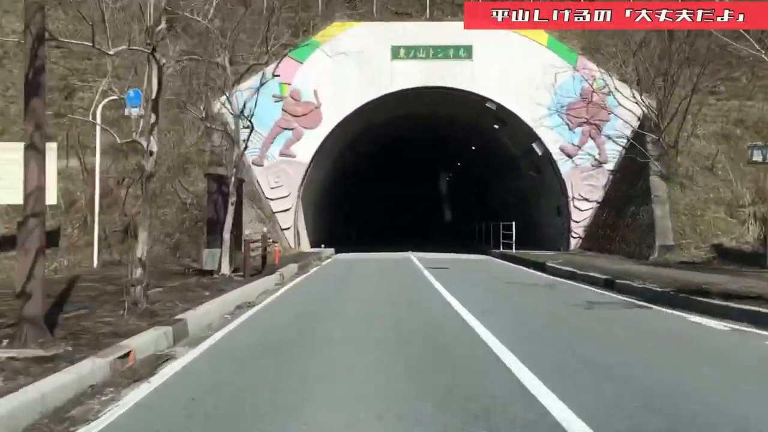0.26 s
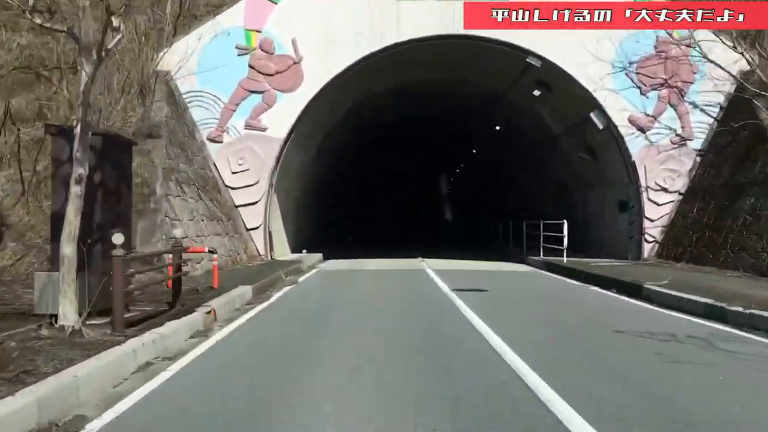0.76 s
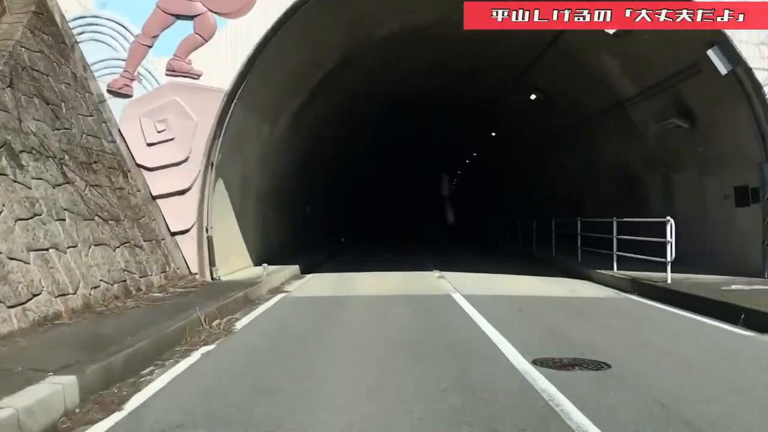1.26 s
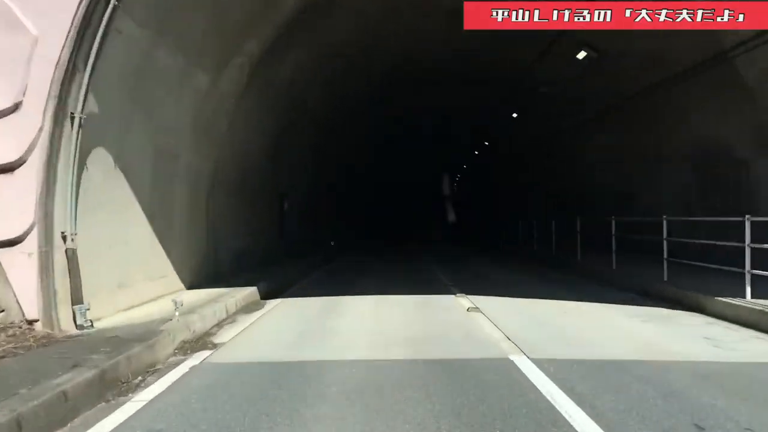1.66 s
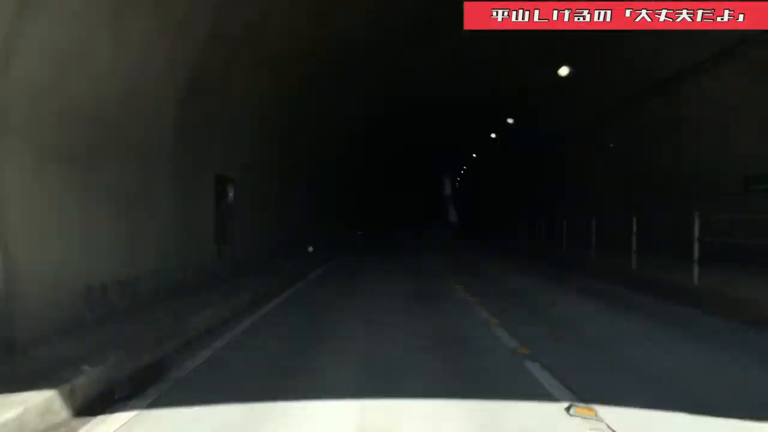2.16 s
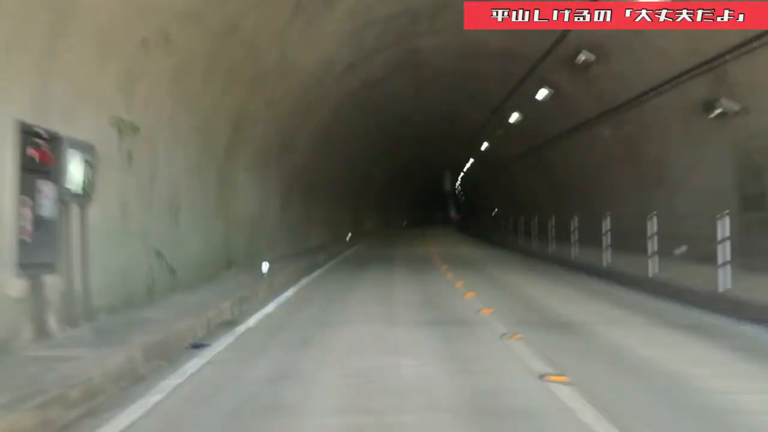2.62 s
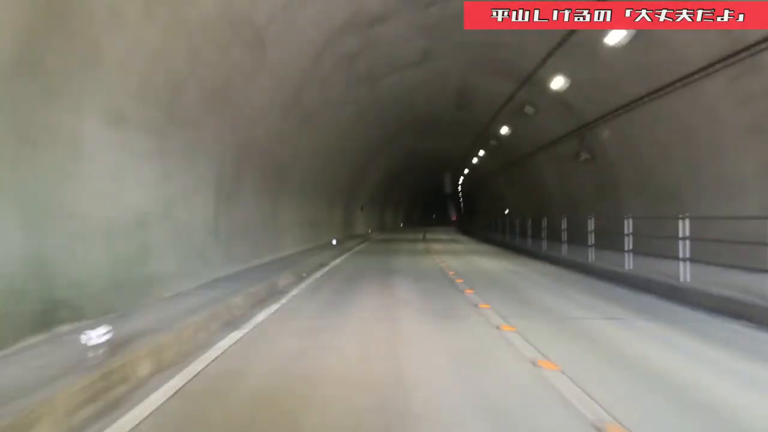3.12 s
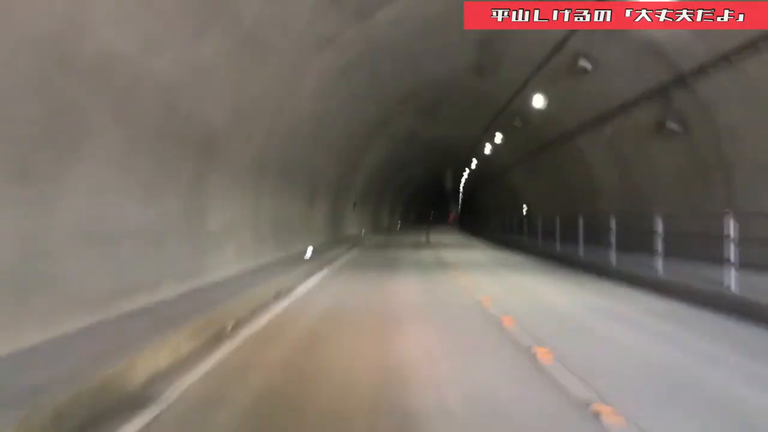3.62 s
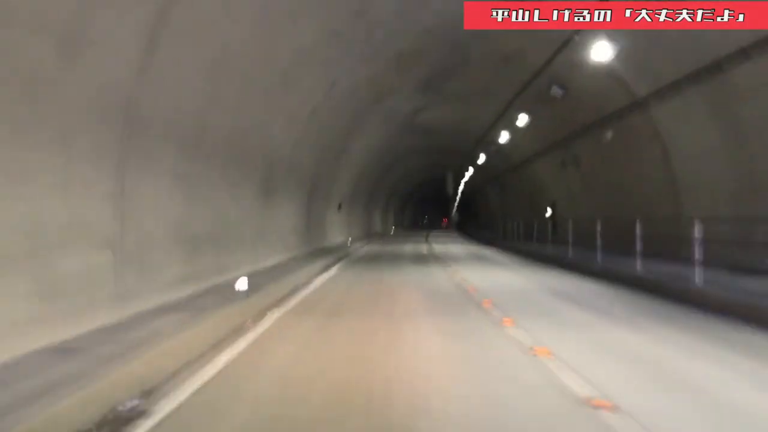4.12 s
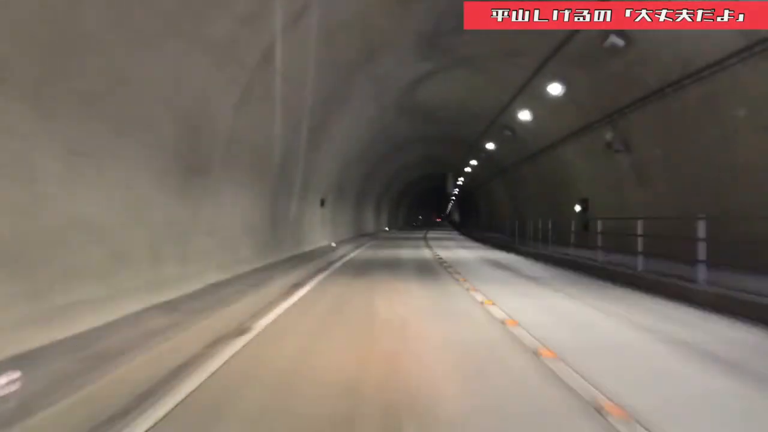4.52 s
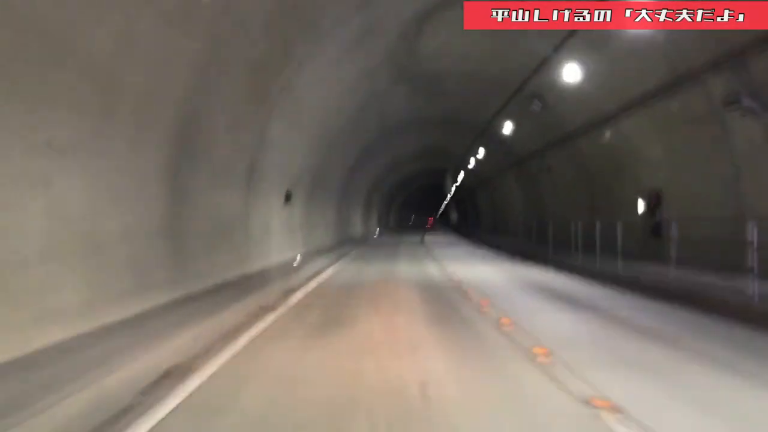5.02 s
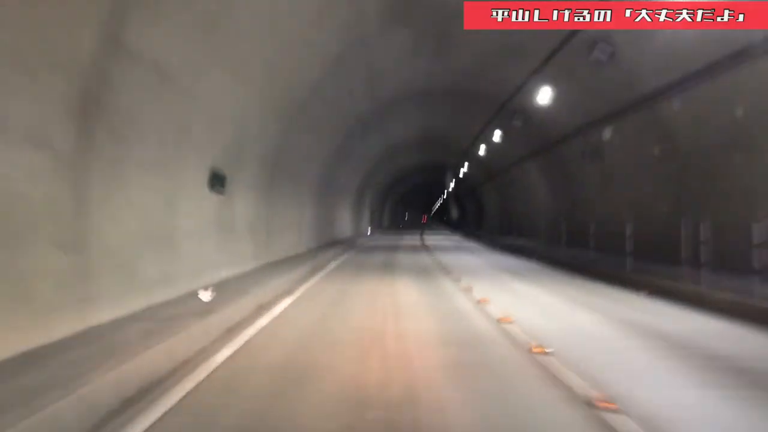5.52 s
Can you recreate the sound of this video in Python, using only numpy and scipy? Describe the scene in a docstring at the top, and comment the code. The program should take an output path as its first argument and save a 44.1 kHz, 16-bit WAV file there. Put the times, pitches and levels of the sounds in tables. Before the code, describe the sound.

Low, bass-heavy car cabin drone slowly rising in pitch, with soft road bumps, a brief plastic click cluster, then slightly fuller road noise in a tunnel.

```python
"""Cabin of a car that gently gathers speed and drives into a road tunnel.
Engine and drive shaft hum as sines on multiples of their own rates; high orders clatter and whine faintly.
The body booms as one unsteady low tone, lifted by bumps; tyre rumble, drone and hiss are filtered noise.
Loose trim clicks as decaying noise bursts, mostly just before the mouth; thin whistles and a top fizz are faint.
Inside, hum and boom ease off while the walls throw a little more tyre noise and hiss back."""
import sys
import numpy as np
from scipy import signal
from scipy.fft import rfft, irfft
from scipy.io import wavfile

SR = 44100
rng = np.random.default_rng(int(sys.argv[2]) if len(sys.argv) > 2 else 0)


def wav_record(signal):
    """Record a signal, one row per channel, as 16-bit PCM in the file named by sys.argv[1]."""
    frames = np.transpose(np.atleast_2d(signal))
    bounded = np.clip(frames, -1, 1)
    # unit amplitude maps onto the largest positive 16-bit level
    quanta = np.round(bounded * 32767).astype(np.int16)
    wavfile.write(sys.argv[1], SR, quanta)


N = 254898
TIME = np.arange(N) / SR
MOUTH_S, ENTRY_S = 2.8, 1.7  # middle and length of the passage into the tunnel

# Engine cycle rate before jitter: (t/s, f/Hz)
CYCLE_RATE = [(0.0, 30.31), (0.82, 30.9), (1.65, 31.16), (2.47, 31.71), (3.3, 32.23), (4.12, 32.66),
              (4.95, 33.12), (5.77, 33.62)]
# Firing hum before flutter, easing off inside the tunnel: (t/s, level/dB)
HUM_LEVEL = [(0, -26.5), (1.4, -25), (3.0, -25), (3.6, -28), (4.3, -27), (4.65, -28.5), (5.78, -31)]
# Weaker engine tones, before orders_db and wander: (multiple of the cycle rate, level/dB)
ENGINE_ORDERS = [(6, -35.5), (7, -40), (8, -41.5), (9, -40.5), (11, -49), (12, -48), (13, -55), (15, -56),
                 (16, -56.5), (17, -55), (18, -57.5), (20, -54.5), (21, -57.5)]
# Orders that sing out for a while, 50 being the gear whine; before orders_db:
# (multiple of the cycle rate, start t/s, end t/s, level/dB)
ENGINE_FLARES = [(6, 2.1, 3.7, -30.5), (6, 4, 6, -31), (9, .7, 2.7, -33.5), (12, 3, 5, -41),
                 (18, .2, 1.8, -51), (27, 1.7, 3.1, -58), (50, .45, 2.2, -54), (52, .3, .8, -63),
                 (53, .4, 1.6, -65), (57, 2.3, 2.88, -60.5), (49, 2.8, 3.3, -61), (50, 2.85, 3.45, -55),
                 (49, 3.55, 4.1, -58), (54, 3.65, 4.6, -61.5), (50, 3.75, 5.05, -53), (48, 4.45, 5.05, -60),
                 (46, 5, 5.9, -59.5), (54, 5, 5.9, -61.5), (47, 5.45, 5.95, -57), (50, 5.5, 6, -55.5)]


def engine(pulses_per_cycle=3, hum_flutter=0.059, jitter=0.00044, orders_db=-0.23):
    """Firing pulses give a strong hum; harmonics, unevenness and gears add weaker orders of the cycle rate."""
    cycle_hz = curves(CYCLE_RATE)[0] * (1 + jitter * drift(5.8))
    cycles = np.cumsum(cycle_hz) / SR
    hum_level = gain_of(curves(HUM_LEVEL)[0]) * (1 + hum_flutter * drift(8))
    hum = hum_level * tone(pulses_per_cycle * cycles)
    orders = partials(cycles, ENGINE_ORDERS, ENGINE_FLARES, wander_db=1.5, flutter=0.2)
    return hum + gain_of(orders_db) * orders, cycles


# Carry of high engine orders into the cabin, per order, before comb_db: (f/Hz, level/dB)
CLATTER_SPECTRUM = [(750, -63.5), (1200, -68), (1450, -71), (1600, -66.5), (1800, -67), (2000, -77),
                    (2800, -88), (3500, -76), (4400, -76), (6400, -83)]


def clatter(cycles, fade_hz=0.73, comb_db=-1):
    """A comb of high engine orders, each fading in and out by chance."""
    comb = sum(drift(fade_hz) * tone(order * cycles) for order in range(24, 110))
    return gain_of(comb_db) * coloured(comb, CLATTER_SPECTRUM)


# Drive shaft tones, before shaft_db and wander: (multiple of shaft speed, level/dB)
SHAFT_ORDERS = [(4, -35), (5, -41.5), (6, -43.5)]
# Shaft orders that sing out, before shaft_db: (multiple of shaft speed, start t/s, end t/s, level/dB)
SHAFT_FLARES = [(4, -.5, .5, -29), (4, .5, 2.6, -33), (4, 4.9, 6.2, -30.5), (5, -.3, 1.5, -32.5),
                (5, 4.9, 6.1, -30), (6, 2.1, 3.8, -33), (7, 2.6, 4.6, -39)]


def shaft(start_hz=37.8, rise_hz_per_s=1.05, shaft_db=-0.5):
    """Orders of a shaft that speeds up steadily, so they slide against those of the engine."""
    turns = np.cumsum(start_hz + rise_hz_per_s * TIME) / SR
    return gain_of(shaft_db) * partials(turns, SHAFT_ORDERS, SHAFT_FLARES, wander_db=3.0, flutter=0.24)


BOOM_HZ, BOOM_WIDTH_HZ = 54.1, 4.43
BOOM_DB, BOOM_FALL_DB_PER_S = -24.5, 2.5  # between bumps; falls from the mouth on, over a smoother floor
BUMP_RISE_S, BUMP_T60_S = 0.035, 0.2
# Road bumps that set the cabin booming: (t/s at the end of the rise, hold/s, level/dB)
ROAD_BUMPS = [(0.011, 0.038, -17), (0.55, 0.046, -21.5), (0.79, .04, -20), (1.505, .06, -22),
              (2.023, .02, -20.5), (2.175, .02, -21), (2.374, .17, -17), (2.696, .01, -19),
              (2.808, 0.069, -20), (3.238, .02, -18), (3.561, 0.027, -17.5), (3.664, 0.028, -20),
              (4.367, 0.094, -19.5), (4.633, 0.11, -17), (5.37, 0.024, -19)]


def boom(unrest=0.29, unrest_hz=8):
    """The cabin rings at one low, unsteady pitch; each bump pulls it to a level, holds it and lets it go."""
    floor_db = BOOM_DB - BOOM_FALL_DB_PER_S * np.maximum(TIME - MOUTH_S, 0)
    level = gain_of(floor_db) * (1 + unrest * drift(unrest_hz))
    for s, hold_s, db in ROAD_BUMPS:
        rise = np.clip((TIME - s) / BUMP_RISE_S + 1, 0, 1)
        decay = gain_of(-60 * np.maximum(TIME - s - hold_s, 0) / BUMP_T60_S)
        level = level + rise * decay * (gain_of(db) - level)
    hz = BOOM_HZ + BOOM_WIDTH_HZ / 2 * drift(7.1)
    return level * tone(np.cumsum(hz) / SR)


# Tyre noise through the body, before the gains in tyres(): (f/Hz, level/dB per Hz)
RUMBLE_SPECTRUM = [(15, -79), (27, -66), (39, -47.5), (62, -46.5), (82, -56.5), (108, -52.5), (135, -54),
                   (170, -52.5), (220, -50.5), (260, -56), (295, -51), (325, -55.5), (375, -55), (450, -70),
                   (600, -113)]
# Relative shape of the tyre drone: (f/Hz, level/dB per Hz)
DRONE_SPECTRUM = [(60, -100), (108, -24), (122, -8), (134, 5.5), (144, -1), (165, -29.5), (300, -100)]
# Passing swells of the low tyre drone: (start t/s, end t/s, peak level/dB)
DRONE_SWELLS = [(-.1, .45, -33), (.7, 1.1, -29.5), (2.28, 2.394, -23.5), (2.54, 2.7, -25),
                (2.88, 3.065, -29.5), (3.753, 3.914, -29.5), (4.153, 4.816, -27), (5.47, 5.663, -24.5)]


def tyres(rumble_db=-0.25, tunnel_db=1.44, patchy_db=1.13, patchy_hz=6, steady_drone_db=-37):
    """Patchy rumble through the suspension; one cabin resonance drones in uneven swells."""
    rumble_gain = gain_of(rumble_db + tunnel_db * inside() + patchy_db * drift(patchy_hz))
    rumble = coloured(white(), RUMBLE_SPECTRUM) * rumble_gain
    drone_level = gain_of(steady_drone_db)
    for start, end, db in DRONE_SWELLS:
        drone_level = np.maximum(drone_level, gain_of(db) * swell(start, end))
    return rumble + drone_level * evened(coloured(white(), DRONE_SPECTRUM))


# Tyre and air noise through the glass, before the gains in hiss(): (f/Hz, level/dB per Hz)
HISS_SPECTRUM = [(250, -72), (480, -72), (660, -70.5), (780, -77.5), (1180, -80), (1420, -83.5),
                 (1680, -82.5), (2050, -89), (2800, -89), (3050, -94.5), (4200, -94), (4900, -99),
                 (6300, -100), (7600, -114), (10000, -130)]


def hiss(cycles, hiss_db=-0.92, rise_db_per_s=0.48, tunnel_db=0.77, flicker_db=0.5, throb=0.055):
    """Airborne noise, throbbing slightly with the engine cycle, rising steadily, louder between the walls."""
    level_db = hiss_db + rise_db_per_s * TIME + tunnel_db * inside() + flicker_db * drift(15)
    pulse = 1 + throb * (tone(cycles) + tone(2 * cycles)) / 2
    return coloured(white(), HISS_SPECTRUM) * gain_of(level_db) * pulse


# Loose trim, before decay and trim_db: (t/s, knock level/dB, bright snap level/dB)
TRIM_CLICKS = [(1.285, -51, -68), (1.406, -47, -57), (1.425, -47, -65), (1.582, -44, -64),
               (2.133, -44.5, -63), (2.188, -49, -66), (2.204, -43, -67), (2.219, -44.5, -37.5),
               (2.298, -50, -54), (2.343, -47, -56), (2.36, -45, -45.5), (2.364, -32.5, -39),
               (2.466, -44, -69), (3.644, -49, -70), (4.196, -43.5, -68)]
# Relative colour of the knock: (f/Hz, level/dB per Hz)
KNOCK_SPECTRUM = [(400, 4), (1000, 4.5), (1400, 2), (1900, 3.5), (2500, 5.5), (3100, -5.5), (4400, -5),
                  (6400, -17), (7600, -25), (11000, -30), (15000, -28)]
# Relative colour of the snap: (f/Hz, level/dB per Hz)
SNAP_SPECTRUM = [(2000, -22), (4400, -22), (5500, 6), (7500, -1.5), (9500, -1.5), (11500, -2),
                 (14000, -3.5), (15700, -5)]


def trim(trim_db=-2, chatter_s=0.0045, t60_s=0.061, crack_db=-8, crack_t60_s=0.0086,
         cabin_db=-18, cabin_t60_s=0.2, grit_db=1.5):
    """Each click cracks, chatters for some milliseconds, then dies away in the padded cabin."""
    t = np.arange(SR // 4) / SR
    decay = gain_of(-60 * np.maximum(t - chatter_s, 0) / t60_s)
    decay += gain_of(crack_db - 60 * t / crack_t60_s)
    decay += gain_of(cabin_db - 60 * t / cabin_t60_s)
    knock_power, snap_power = np.zeros((2, N))
    for s, knock_db, snap_db in TRIM_CLICKS:
        first = round(s * SR)
        part = slice(first, first + len(t))
        knock_power[part] += (gain_of(knock_db) * decay) ** 2  # separate clicks add in power
        snap_power[part] += (gain_of(snap_db) * decay) ** 2
    knocks = np.sqrt(knock_power) * evened(coloured(white(), KNOCK_SPECTRUM))
    snaps = np.sqrt(snap_power) * evened(coloured(white(), SNAP_SPECTRUM))
    grit = gain_of(trim_db + grit_db * np.clip(drift(170), -2, 2))
    return grit * (knocks + snaps)


# Thin high whistles: (mean f/Hz, start t/s, end t/s, peak level/dB)
WHISTLE_TONES = [(5216, .1, 1, -75), (3179, 2.38, 2.88, -63.5), (3179, 2.9, 6, -76)]


def whistle(waver_hz=3):
    """Faint, nearly steady high sines, strongest just around the tunnel mouth."""
    total = 0
    for hz, start, end, db in WHISTLE_TONES:
        turns = np.cumsum(hz + waver_hz * drift(10)) / SR
        total = total + gain_of(db) * swell(start, end) * tone(turns)
    return total


# Relative colour of the top hiss: (f/Hz, level/dB per Hz)
FIZZ_SPECTRUM = [(3000, -25.5), (6500, 0), (7600, -0.5), (8400, 0), (9800, -2.5), (10450, -12), (11200, -9),
                 (13500, -7), (15700, -16)]


def fizz(fizz_db=-70, tunnel_db=0.1, wander_db=0.5, swell_start_s=0.84, swell_end_s=0.86, swell_db=-73):
    """A faint, thin noise at the very top, with one brief swell."""
    level = gain_of(fizz_db + tunnel_db * inside() + wander_db * drift(4))
    level = level + gain_of(swell_db) * swell(swell_start_s, swell_end_s)
    return level * evened(coloured(white(), FIZZ_SPECTRUM))


def inside():
    """0 on the open road, 1 between the tunnel walls."""
    return np.clip((TIME - MOUTH_S) / ENTRY_S + 0.5, 0, 1)


def partials(turns, steady, flares, wander_db, flutter):
    """Tones on multiples of a base rate; each wanders in level and swells during its flares."""
    levels = {round(order): gain_of(db + wander_db * drift(1.5)) for order, db in steady}
    for order, start, end, db in flares:
        flare = gain_of(db) * swell(start, end, roundness=0.22)
        levels[order] = np.maximum(levels.get(order, 0), flare)
    return sum(level * (1 + flutter * drift(7.7)) * tone(order * turns) for order, level in levels.items())


def swell(start, end, roundness=0.45):
    """A rise and fall between two times, 1 at the top; the less round, the longer it holds."""
    share = np.clip((TIME - start) / (end - start), 0, 1)
    return np.sin(np.pi * share).clip(0) ** roundness


def tone(turns):
    """A sine of rms 1 that follows a count of turns from a random phase."""
    return np.sqrt(2) * np.sin(2 * np.pi * (turns + rng.random()))


def drift(rate_hz):
    """Slow chance of rms 1, moving at up to about rate_hz."""
    size = 2048
    grid = np.linspace(0, TIME[-1], size)
    hz = np.fft.rfftfreq(size, grid[1])
    slow = irfft(rfft(rng.standard_normal(size)) / np.sqrt(1 + (hz / rate_hz) ** 4))
    return np.interp(TIME, grid, evened(slow))


def white():
    """Noise of 0 dB per Hz."""
    return rng.standard_normal(N) * np.sqrt(SR / 2)


def coloured(x, points):
    """Filters by a spectrum of (f/Hz, level/dB) points on a log-frequency axis."""
    hz, db = np.transpose(points)
    bins = np.fft.rfftfreq(len(x), 1 / SR)
    gain = gain_of(np.interp(np.log(bins + 1), np.log(hz), db))
    return irfft(rfft(x) * gain, len(x))


def curves(rows):
    """Each column of a table, joined by straight lines in time."""
    s, *columns = np.transpose(rows)
    return [np.interp(TIME, s, column) for column in columns]


def evened(x):
    """Scales to rms 1."""
    return x / np.sqrt(np.mean(x ** 2) + 1e-20)


def gain_of(db):
    """Decibels to amplitude."""
    return 10 ** (np.asarray(db) / 20)


def scene():
    """Sum of all the sources in the cabin, as one channel."""
    engine_tones, cycles = engine()
    drive = engine_tones + clatter(cycles) + shaft()
    road = boom() + tyres() + hiss(cycles)
    return (drive + road + trim() + whistle() + fizz())[None]


def record(dry, edge_hz=15730):
    """The recorder's band limit: a steep linear-phase lowpass."""
    lowpass = signal.firwin(1023, edge_hz, window=("kaiser", 9), fs=SR)
    return signal.oaconvolve(dry, lowpass[None], "same")


dry = scene()
out = record(dry)
wav_record(out)
```